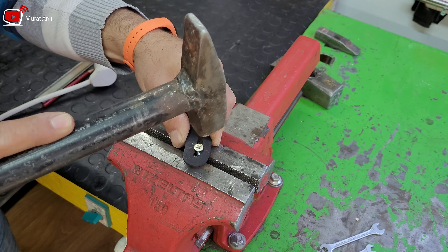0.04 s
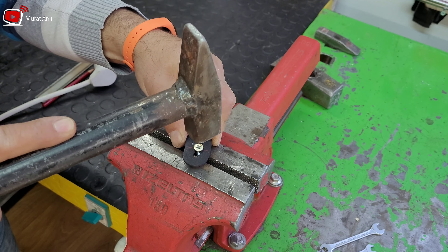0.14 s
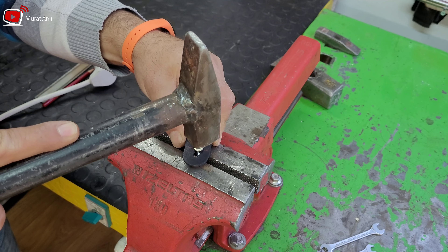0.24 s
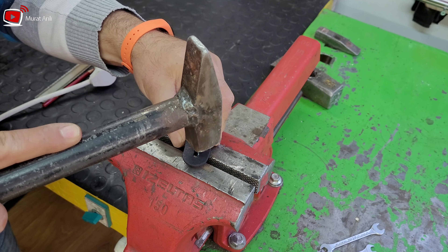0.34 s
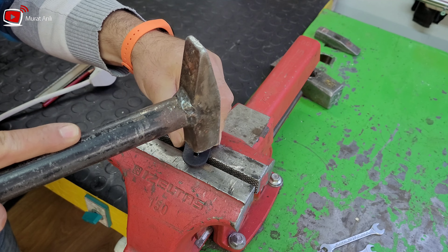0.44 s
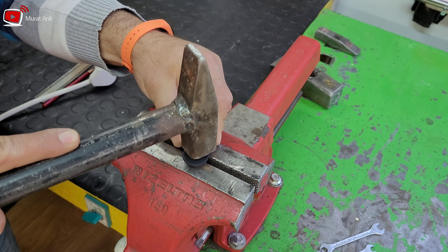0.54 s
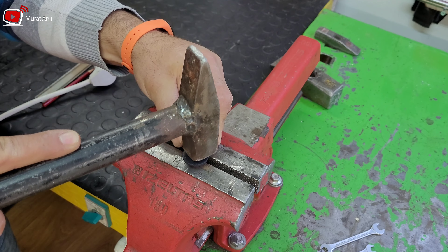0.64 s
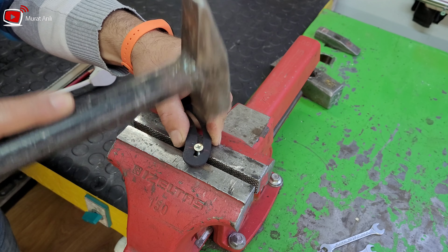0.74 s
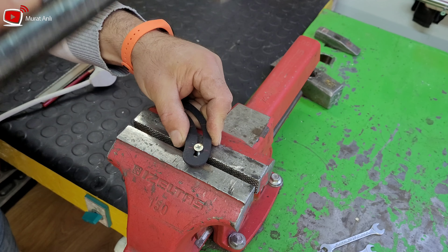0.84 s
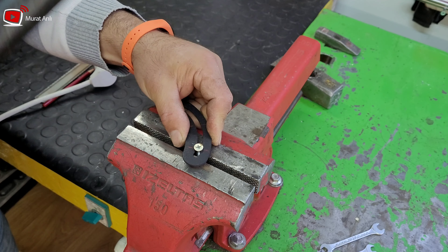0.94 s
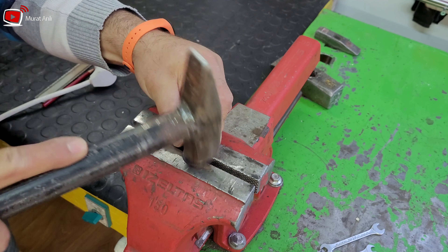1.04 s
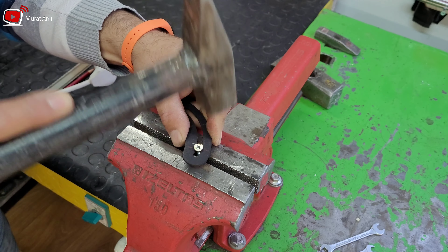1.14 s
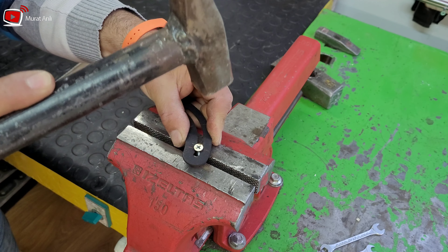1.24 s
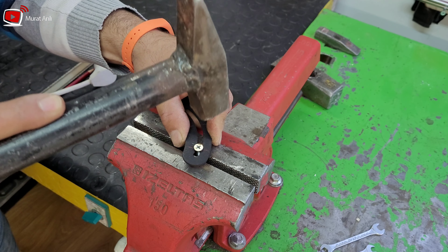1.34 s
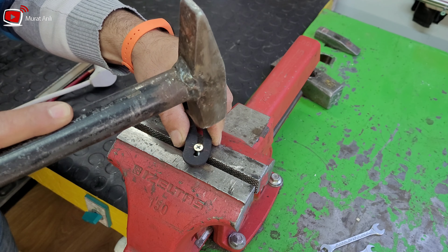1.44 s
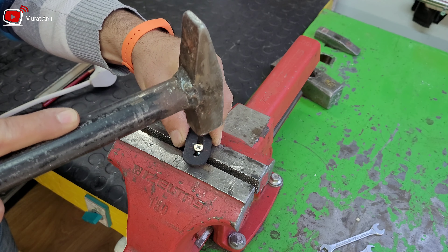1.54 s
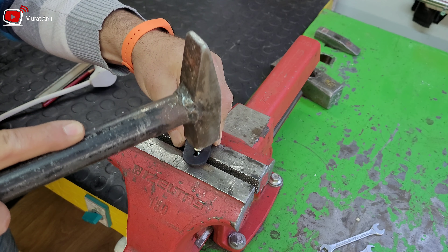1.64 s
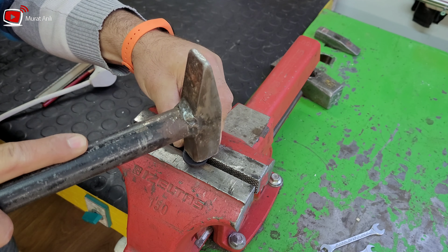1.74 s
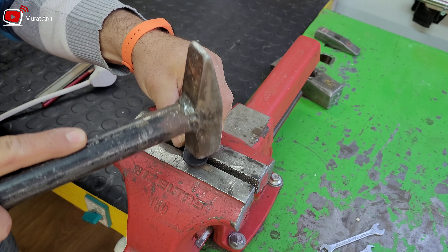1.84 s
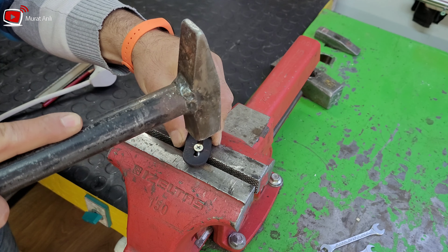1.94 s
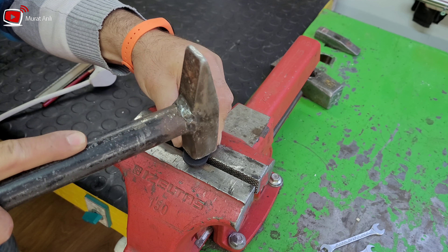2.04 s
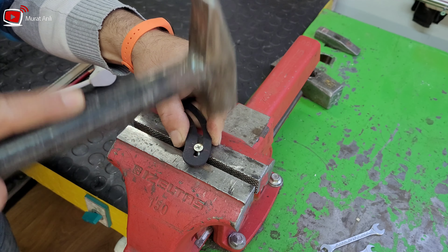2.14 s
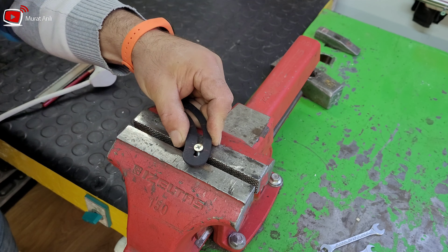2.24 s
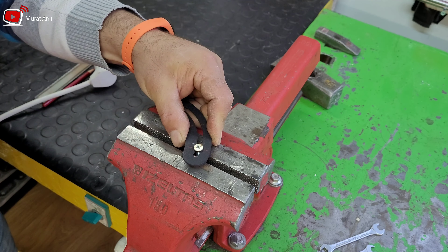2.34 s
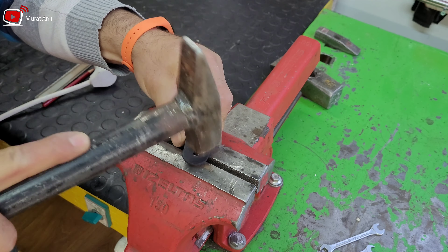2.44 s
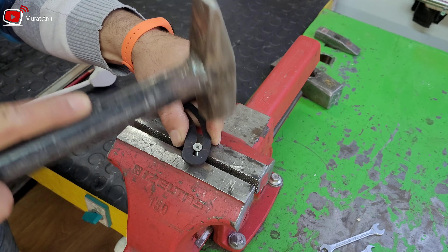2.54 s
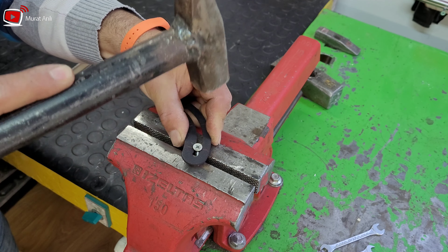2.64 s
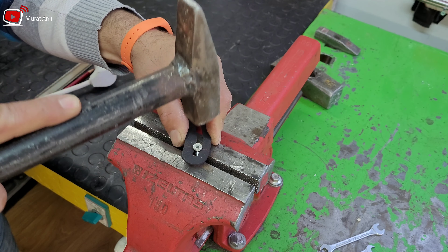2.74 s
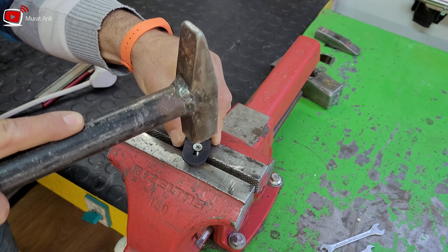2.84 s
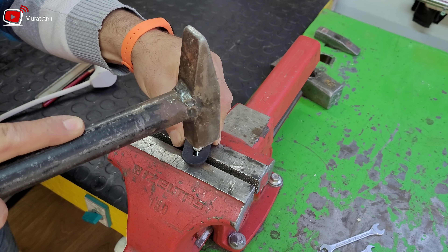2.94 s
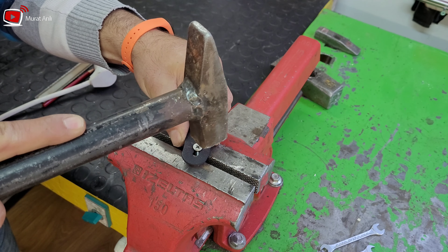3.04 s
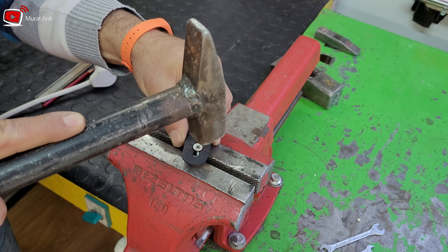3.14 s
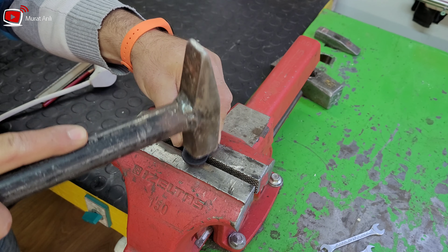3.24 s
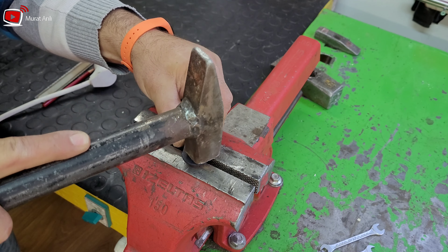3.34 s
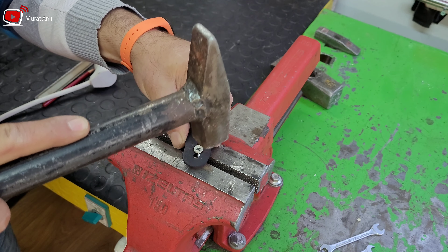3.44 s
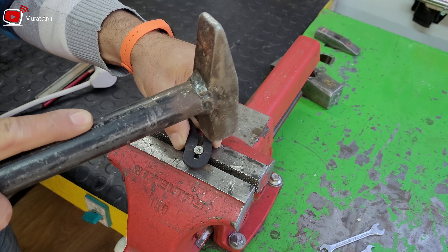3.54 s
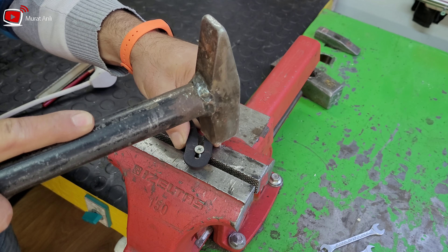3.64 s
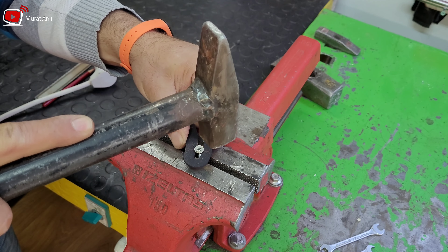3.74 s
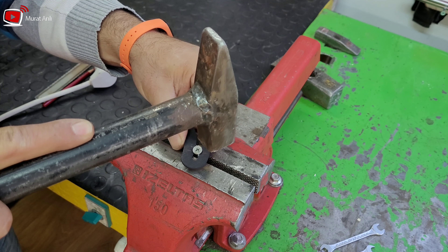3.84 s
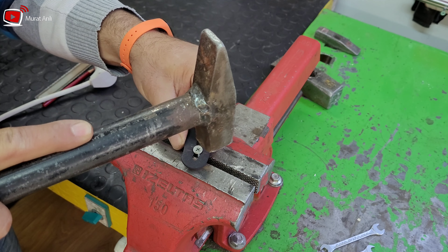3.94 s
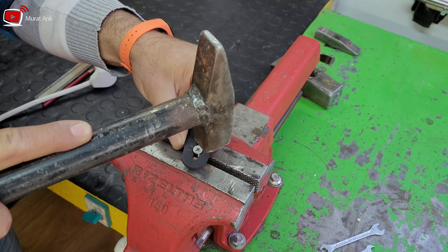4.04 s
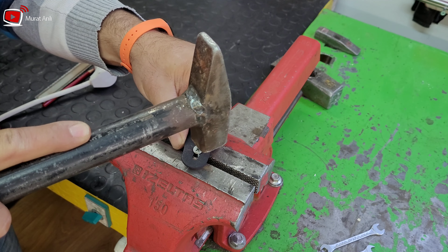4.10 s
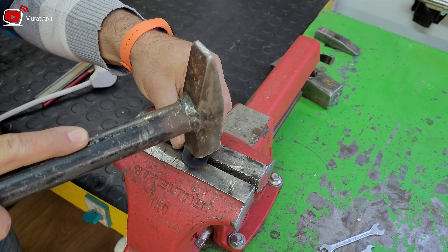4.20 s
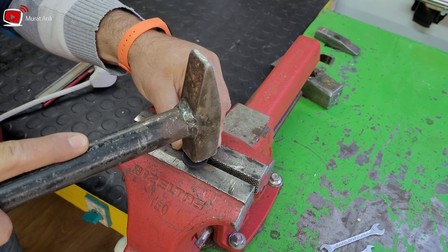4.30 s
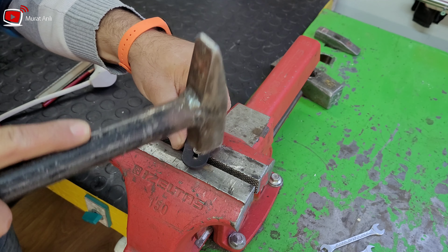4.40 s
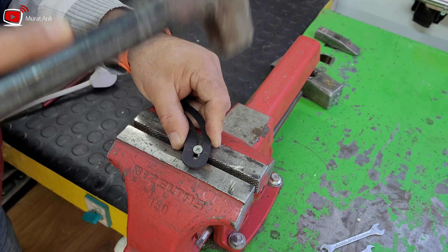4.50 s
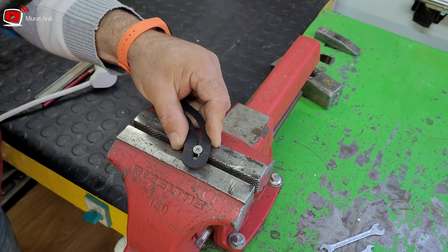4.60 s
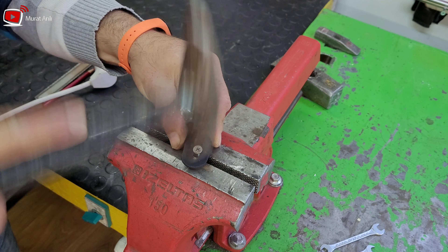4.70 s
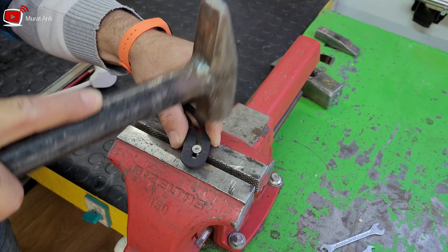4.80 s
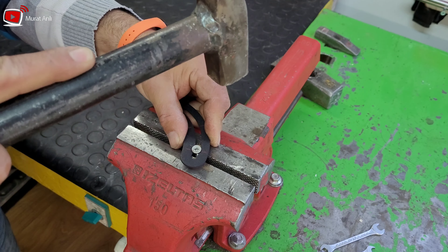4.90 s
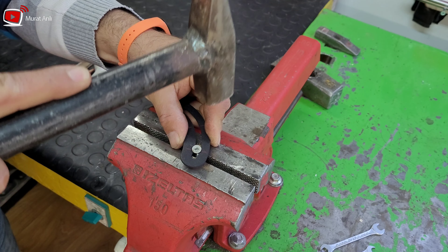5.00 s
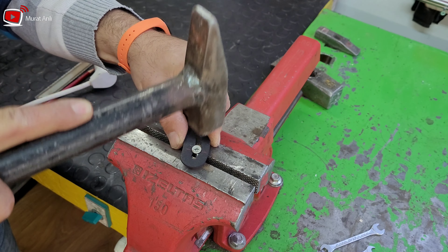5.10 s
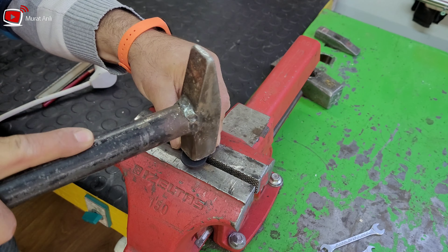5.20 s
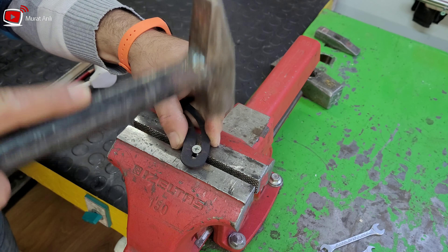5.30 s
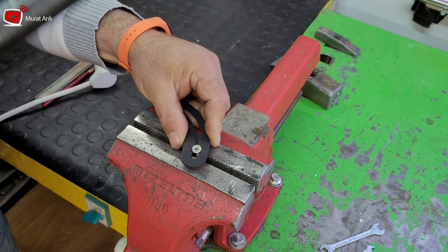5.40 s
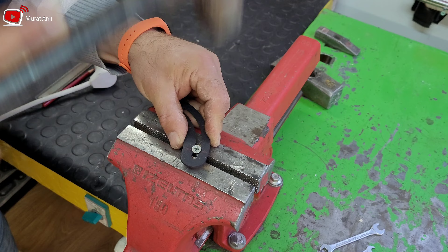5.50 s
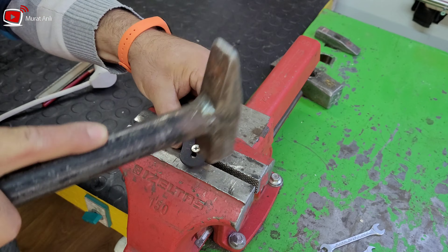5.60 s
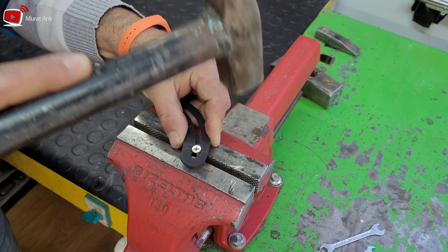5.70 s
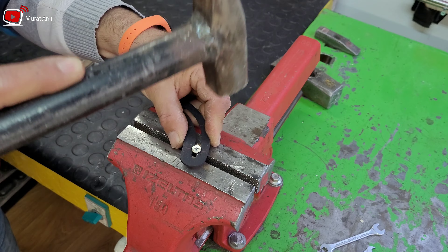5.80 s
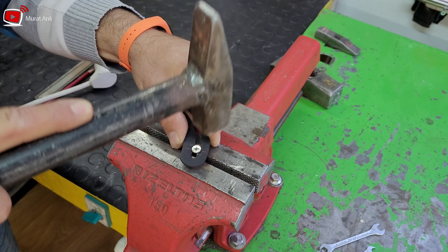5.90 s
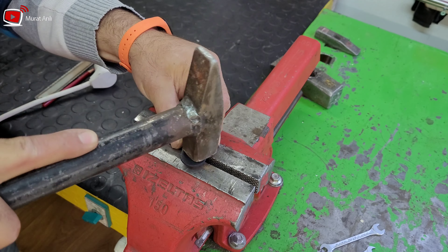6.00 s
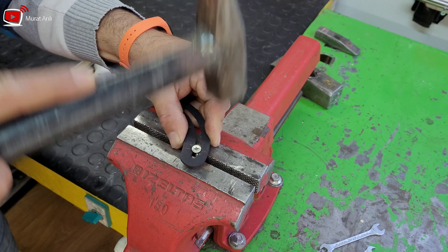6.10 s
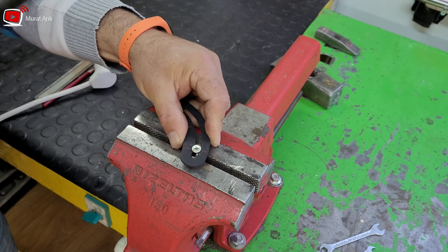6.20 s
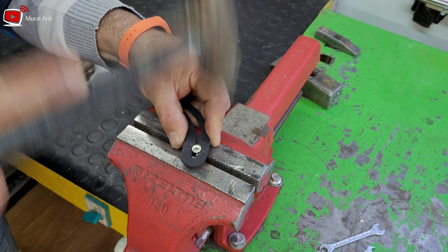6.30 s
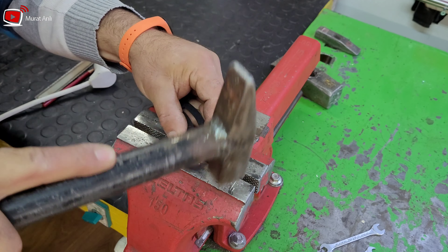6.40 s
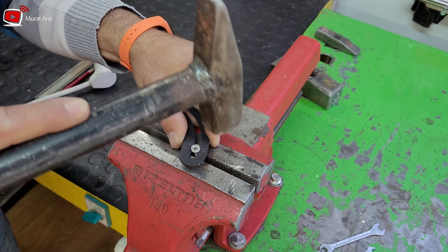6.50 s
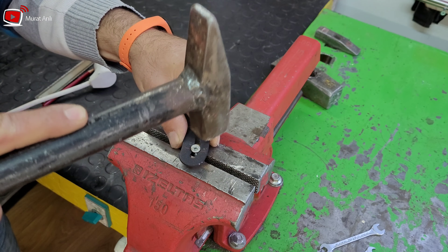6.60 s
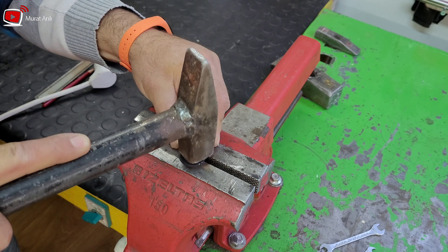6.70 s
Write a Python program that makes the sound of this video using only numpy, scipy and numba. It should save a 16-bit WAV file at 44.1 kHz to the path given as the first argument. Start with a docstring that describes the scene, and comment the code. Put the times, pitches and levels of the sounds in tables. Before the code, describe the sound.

At the start a small metal part softly knocks and scrapes on vise jaws. A barely audible hammer tap comes at 0.7 seconds, then a hard blow on a steel screw at 1.1. Light aiming taps follow at 1.8 and, doubled, at 2.1, before a second hard blow at 2.5. Two faint taps at 3.3 and 4.3 make the loose part buzz slightly. Three more hard blows land at 4.8, 5.6 and 6.4 seconds, with light taps between them at 5.3 and 6.1. Each hard blow is a sharp crack with a short steel clang and a low shudder from the workbench; the part rings a little more as the screw seats. The microphone is close, so the loudest hits sound slightly flattened. The workshop adds a short echo over very faint air noise and electrical hum.

```python
"""A sheet-metal part knocks and scrapes on vise jaws, then a hammer sets a steel screw in it:
five hard blows among light aiming taps. Each contact cracks, rings vise, part, screw and hammer head,
and rocks the bench. Every hard blow seats the screw tighter, so the part rings more.
A live workshop answers over faint air and mains hum; the close microphone's limiter flattens the blows."""
import sys
import numpy as np
from scipy import signal
from scipy.fft import rfft, irfft
from scipy.io import wavfile
from scipy.ndimage import uniform_filter1d, minimum_filter1d
from numba import njit

SR = 44100
rng = np.random.default_rng(int(sys.argv[2]) if len(sys.argv) > 2 else 0)


def inscribe(sig):
    """Save sig as 16-bit PCM at rate SR to the path in sys.argv[1].

    A 1-D sig is mono; a 2-D sig holds one channel per row.
    Samples are clipped to [-1, 1] before scaling.
    """
    pcm = np.round(np.clip(np.atleast_2d(sig).T, -1, 1) * 32767)
    wavfile.write(sys.argv[1], SR, pcm.astype(np.int16))


N = 297675
T = np.arange(N) / SR
RING_T = T[:65536]

# hammer contacts; how squarely the face lands offsets the thud, the vise and part clang, the screw ping
# start_s, strength_db, thud_db, clang_db, ping_db
BLOWS = [(0.656, -55.5, -3, 2, -4), (1.1024, -0.5, 1, -19.5, -16.5), (1.804, -44, 4, 2, 0),
         (2.0998, -25, 3.5, -1, -2), (2.133, -37, 2.5, -5.5, -16), (2.513, -0.5, -2, -4, -20),
         (3.347, -35.5, -0.5, -2.5, 4), (4.346, -43.5, -2, -4, 0), (4.8057, -0.5, 1.5, -2, -10),
         (5.257, -26, 7, 1.5, -4.5), (5.634, -1, 0, -1, -20.5), (6.067, -25, 1.5, 2.5, -0.5),
         (6.419, -1.5, -4.5, -2.5, -17.5)]


def undb(db):
    """Decibels to gain."""
    return 10 ** (np.asarray(db) / 20)


def along(table, hz, column=1):
    """Table column interpolated over log frequency."""
    rows = np.array(table)
    return np.interp(np.log(np.maximum(hz, 1)), np.log(rows[:, 0]), rows[:, column])


def add(track, start_s, sound):
    """Mix a sound into a mono track."""
    start = int(start_s * SR)
    track[start:start + len(sound)] += sound[:N - start]


def panned(x, pan_db):
    """Stereo with left pan_db above right."""
    return x * undb([[pan_db / 2], [-pan_db / 2]])


def through(x, response):
    """Mono sound through a stereo response."""
    return signal.fftconvolve(x[None], response, axes=1)[:, :N]


def swell(rise_s):
    """Exponential rise from 0 to 1."""
    return 1 - np.exp(-RING_T / rise_s)


def decay(t60_s):
    """Fade of 60 dB per t60_s."""
    return undb(-60 * RING_T / t60_s)


def noise_spectrum(size):
    """Frequencies and spectrum of white stereo noise, near mono in the bass."""
    # left-right likeness: freq_hz, correlation
    likeness = [(30, 0.94), (100, .97), (250, .9), (500, 0.58), (1000, 0.042), (2000, 0.062), (8000, 0),
                (13000, 0.52)]
    hz = np.fft.rfftfreq(size, 1 / SR)
    mid, side = rfft(rng.standard_normal((2, size)))
    correlation = along(likeness, hz)
    mid *= np.sqrt((1 + correlation) / 2)
    side *= np.sqrt((1 - correlation) / 2)
    return hz, np.array([mid + side, mid - side])


def click(colour, body_db=0, treble_db=0, size=4096):
    """Minimum-phase pulse of a given spectrum, with a low bell and a treble shelf."""
    body_hz, treble_hz = 320, 11000.
    hz = np.fft.rfftfreq(size, 1 / SR)
    body = np.exp(-.7 * np.log((hz + 1) / body_hz) ** 2)
    treble = hz ** 4 / (hz ** 4 + treble_hz ** 4)
    cepstrum = irfft(np.log(undb(along(colour, hz) + body_db * body + treble_db * treble)))
    cepstrum[1:size // 2] *= 2
    cepstrum[size // 2 + 1:] = 0
    return irfft(np.exp(rfft(cepstrum)))


def ring(modes, scatter_db):
    """Decaying sines, levels scattered anew on each call."""
    offsets_db = scatter_db * rng.standard_normal(len(modes))
    return sum(undb(level_db + offset_db) * np.sin(2 * np.pi * hz * RING_T) * decay(t60_s)
               for (hz, level_db, t60_s), offset_db in zip(modes, offsets_db))


def dense_response(table):
    """Overlapping echoes: stereo noise bands, each with its own decay."""
    hz, noise = noise_spectrum(len(RING_T))
    noise *= undb(along(table, hz))
    edges_hz = np.geomspace(25, 18000, 28)
    response = 0
    for low_hz, high_hz in zip(edges_hz, edges_hz[1:]):
        band = irfft(noise * ((hz >= low_hz) & (hz < high_hz)))
        response += band * decay(along(table, np.sqrt(low_hz * high_hz), column=2))
    return response


def background():
    """Low workshop air and mains hum."""
    # air spectrum: freq_hz, density_db
    air_colour = [(25, -13), (48, -9), (70, -16.5), (95, -9.5), (125, -10), (160, -20.5), (215, -8),
                  (270, -9), (400, -19.5), (560, -25.5), (800, -27), (1300, -35.5), (4000, -50.5),
                  (16000, -48)]
    # mains harmonics: pitch_hz, rms_db
    harmonics = [(100, -73), (200, -69.5), (300, -80), (400, -79.5), (500, -85.5)]
    hz, noise = noise_spectrum(N)
    air = irfft(noise * undb(along(air_colour, hz)), N)
    hum = sum(np.sqrt(2) * undb(rms_db) * np.sin(2 * np.pi * (pitch_hz * T + rng.random()))
              for pitch_hz, rms_db in harmonics)
    return undb(-68) * air / air.std() + hum


def workshop_reverb(contacts, rings):
    """Wall echoes and low room modes build up, then die away."""
    # wall echoes: freq_hz, level_db, t60_s
    walls = [(40, -8, 0.79), (120, -12, 0.71), (274, -4, 0.74), (467, -5.5, 0.5), (1030, -7, 0.49),
             (2100, -1, 0.49), (4500, -0.5, 0.47), (7995, 0, 0.41), (12800, -9, 0.34)]
    # standing waves: pitch_hz, level_db, t60_s
    room_modes = [(64.5, -21, 0.26), (93.4, -29.5, 0.69), (114.94, -28.5, 0.6), (146, -34, 0.93),
                  (177, -25.5, 0.68), (192, -37.5, 0.43), (248.1, -30, 1.016), (267.7, -39.5, .9),
                  (291.2, -40, 1.1), (324.7, -39, 0.77), (427, -34, 0.45), (498, -35.5, 0.5)]
    response = dense_response(walls) * swell(rise_s=.0053)
    response += ring(room_modes, scatter_db=.5) * swell(rise_s=.018)
    # the highest rings come from small parts and hardly fill the room
    far_rings = signal.sosfilt(signal.butter(2, 7500, fs=SR, output="sos"), rings)
    return through(contacts + undb(-36.5) * far_rings, response)


def placing():
    """The part knocks and rubs on the jaws, then slides in one push: a dense run of tiny slips."""
    # knocks on the jaws: start_s, level_db
    nudges = [(.008, -39.5), (0.027, -46.5), (.064, -29)]
    # knock spectrum: freq_hz, level_db
    nudge_colour = [(30, -5), (150, 4), (550, 7), (900, -7.5), (3000, -17.5), (15000, -50)]
    # slip spectrum: freq_hz, level_db
    slide_colour = [(40, -4), (200, 2), (500, 6), (760, 8), (980, 14), (1060, 21), (1150, 8), (2000, 8),
                    (2600, 1.5), (4500, -0.5), (7500, -15), (9000, -20), (15000, -25)]
    peak_s, width_s = .11, .018
    push = undb(-67) * np.exp(-.5 * ((T - peak_s) / width_s) ** 2)
    rub = undb(-99) * (T < peak_s)
    slips = rng.standard_normal(N) * undb(2.4 * rng.exponential(size=N))
    out = signal.fftconvolve(slips * (push + rub), click(slide_colour))[:N]
    for start_s, level_db in nudges:
        add(out, start_s, undb(level_db) * click(nudge_colour))
    return out


def buzzing():
    """The loosely held part buzzes on the jaws after some light taps."""
    # rattle bands: start_s, centre_hz, width_hz, level_db
    buzzes = [(0.656, 2200, 348, -55), (1.803, 1890, 700, -48.5), (3.347, 1810, 448, -40),
              (3.349, 910, 200, -40), (4.346, 1050, 250, -47)]
    out = np.zeros((2, N))
    for start_s, centre_hz, width_hz, level_db in buzzes:
        hz, noise = noise_spectrum(len(RING_T))
        band = irfft(noise / (1 + ((hz - centre_hz) / (width_hz / 2)) ** 2))
        rattle = undb(level_db) * band / band.std() * swell(rise_s=.0043) * decay(t60_s=.4)
        for track, sound in zip(out, rattle):
            add(track, start_s, sound)
    return out


def bench_sway():
    """The heavy bench picks up each contact slowly; past a limit, more strength rocks it no further."""
    # bench modes: pitch_hz, level_db, t60_s
    bench = [(63, 5.5, .44), (65, -8.5, 0.38)]
    limit_db = -15.5
    out = np.zeros(N)
    for start_s, strength_db, thud_db, _, _ in BLOWS:
        level_db = min(4 + 1.01 * strength_db, limit_db) + thud_db
        add(out, start_s, undb(level_db) * ring(bench, scatter_db=3) * swell(rise_s=.18) ** 2)
    return out


def steel_rings():
    """Each contact rings the steel; the part rings more as hard blows seat the screw."""
    # modes of vise, part, hammer head, screw head, a loose steel piece: pitch_hz, level_db, t60_s
    vise = [(496, -16.5, 0.057), (650, -15.5, 0.45), (768, -13, 0.3), (882.5, -13, 0.41),
            (1050, -13, 0.021), (1057, 0, 0.18), (1426, -25.5, 0.15), (1754, -12, 0.048)]
    part = [(2465, -27.5, .55), (2494, 3.5, 0.082), (2640, -12.5, .06), (5250, -23.5, .35)]
    hammer = [(4755, -13, .14), (7920, -5, .15), (8030, -7, .11), (8330, -10, .1), (9927, -10, .15)]
    screw = [(12400, 3, .08), (13250, -12, .08), (15290, -9, .09)]
    loose_steel = [(2191, 0, .6)]
    hard_db, seating_db_per_blow = -12, 3.83
    hard_blows = 0
    out = np.zeros(N)
    for start_s, strength_db, _, clang_db, ping_db in BLOWS:
        hard_blows += strength_db > hard_db
        for modes, level_db in ((vise, strength_db + clang_db - .7),
                                (part, strength_db + clang_db - 17 + seating_db_per_blow * hard_blows),
                                (hammer, .52 * strength_db - 18),
                                (screw, strength_db + ping_db)):
            add(out, start_s, undb(level_db) * ring(modes, scatter_db=1))
        singing = ring(loose_steel, scatter_db=4) * swell(rise_s=.07) ** 2
        add(out, start_s, undb(strength_db - 20) * singing)
    return out


def hammer_cracks():
    """Steel cracks on steel; hard blows also make the part chatter on the jaws."""
    # contact spectrum: freq_hz, level_db
    crack_colour = [(25, -10.5), (60, 2.5), (130, 11), (300, 11.5), (700, 13), (1000, 12.5), (1350, 5),
                    (2000, 1.5), (3300, 0), (6000, -8), (9500, -8.5), (12000, -2), (15500, -5.5)]
    chatter_fade_s = .017
    out = np.zeros(N)
    for start_s, strength_db, thud_db, _, _ in BLOWS:
        # light taps have relatively more thud and tick
        body_db = thud_db - 2.9 - .18 * strength_db
        treble_db = -.7 - .36 * strength_db
        crack = undb(strength_db) * click(crack_colour, body_db, treble_db)
        add(out, start_s, crack)
        chatter = rng.standard_normal(len(RING_T)) * swell(rise_s=.0085) * np.exp(-RING_T / chatter_fade_s)
        add(out, start_s, undb(3.9 * strength_db - 26) * signal.fftconvolve(crack, chatter))
    return out


def scene():
    """Contacts reach the microphone straight, off the bench top and from the walls."""
    # bench-top reflections: freq_hz, level_db, t60_s
    bench_top = [(60, -18, .04), (150, -6, 0.16), (400, -6, 0.097), (1500, -12, 0.015), (5070, -2.5, 0.012),
                 (9200, 10.5, 0.0068), (13300, 9, 0.006)]
    left_lag_samples = 3
    contacts = hammer_cracks() + placing()
    rings = steel_rings()
    straight = undb(8.5) * contacts + rings
    near = np.array([np.pad(straight, (left_lag_samples, 0))[:N], straight])
    near += through(contacts, dense_response(bench_top))
    near += panned(bench_sway(), pan_db=-4) + buzzing()
    return panned(near + workshop_reverb(contacts, rings) + background(), pan_db=-.5)


@njit
def follow_peaks(x, release):
    """Peak envelope: instant attack, exponential release."""
    out, envelope = np.empty(len(x)), 0.
    for i in range(len(x)):
        envelope = max(x[i], envelope * release)
        out[i] = envelope
    return out


def record(dry):
    """Soft microphone overload, look-ahead limiter, steep low-pass."""
    overload_db, top_hz = 5, 15600
    ceiling_db, release_s, window_samples = -3, .024, 45
    sound = undb(overload_db) * np.tanh(dry / undb(overload_db))
    peaks = follow_peaks(np.abs(sound).max(axis=0), np.exp(-1 / (release_s * SR)))
    gain = np.minimum(1, undb(ceiling_db) / (peaks + 1e-9))
    gain = uniform_filter1d(minimum_filter1d(gain, window_samples), window_samples)
    return signal.sosfilt(signal.ellip(8, .2, 70, top_hz, fs=SR, output="sos"), sound * gain)


dry = scene()
out = record(dry)
inscribe(out)
```